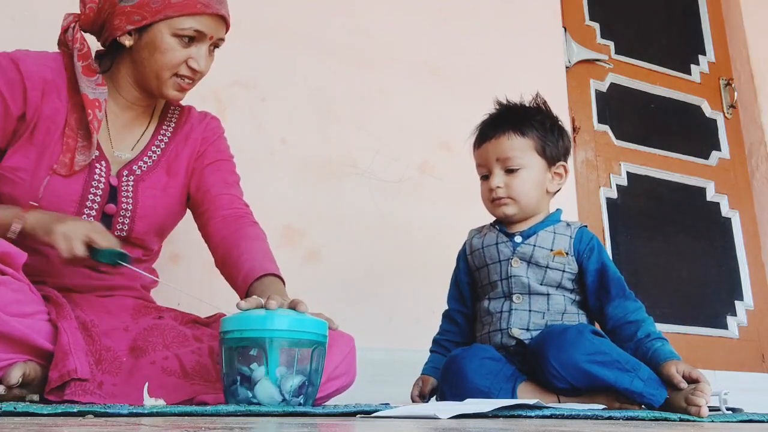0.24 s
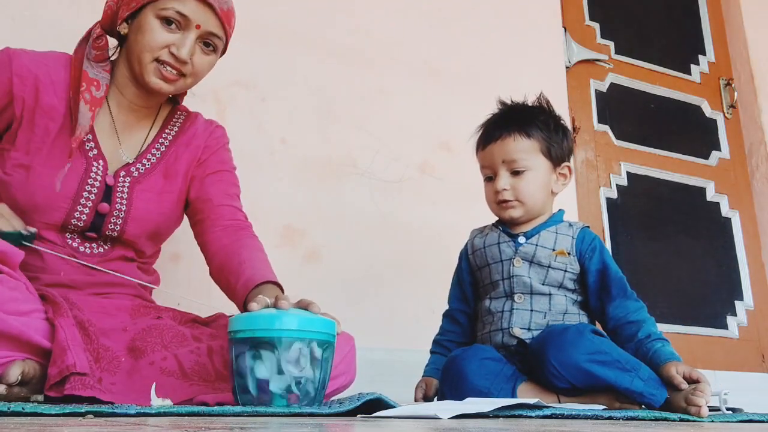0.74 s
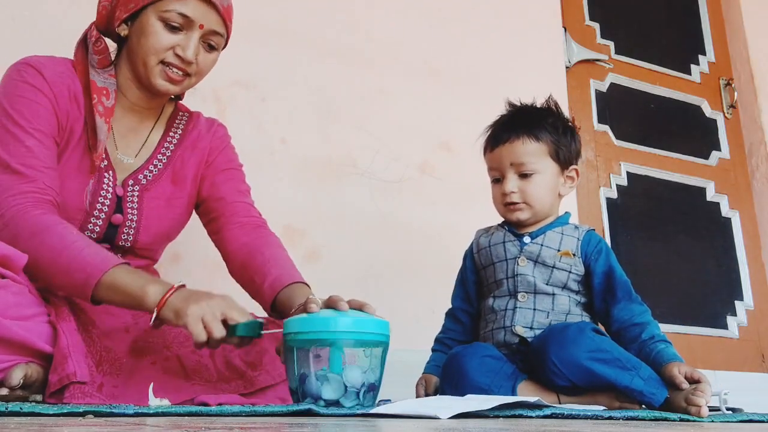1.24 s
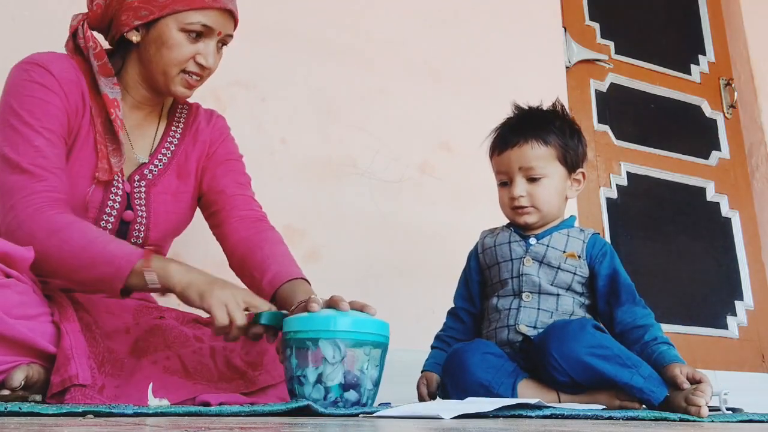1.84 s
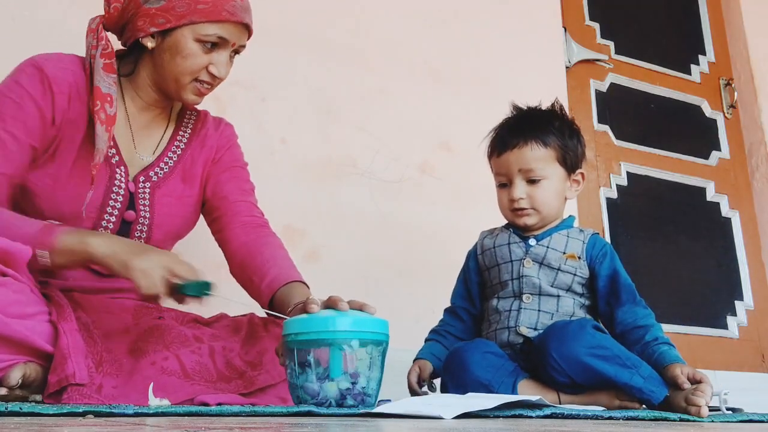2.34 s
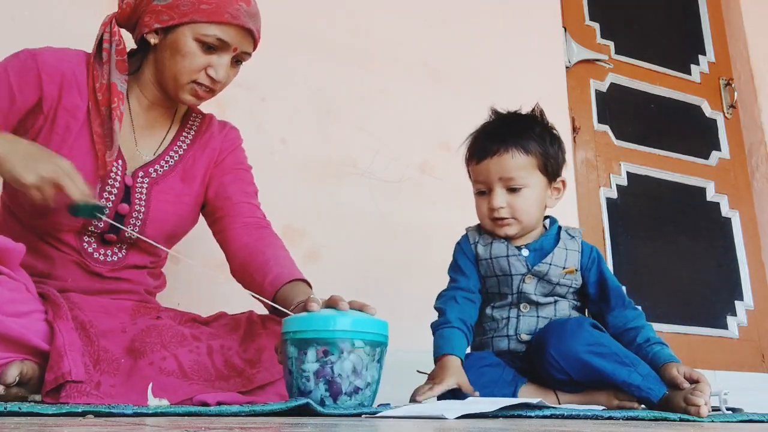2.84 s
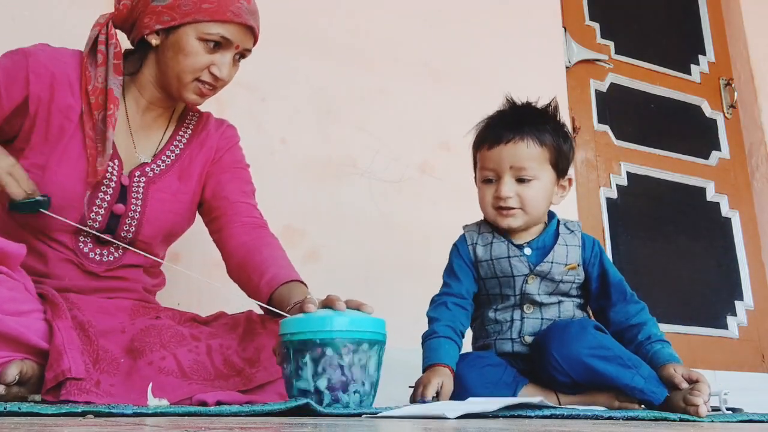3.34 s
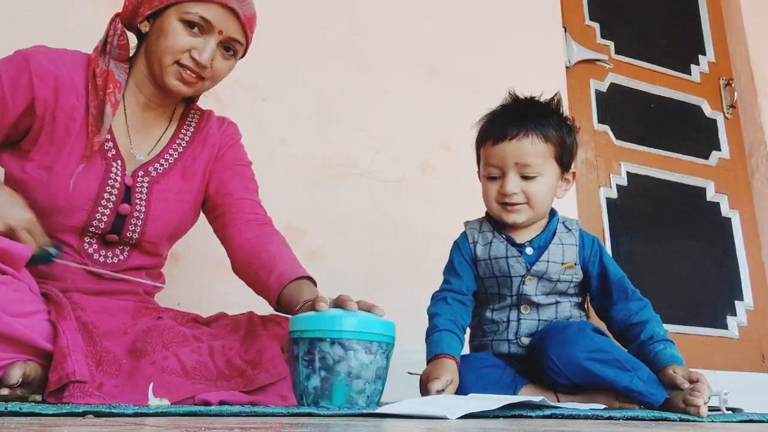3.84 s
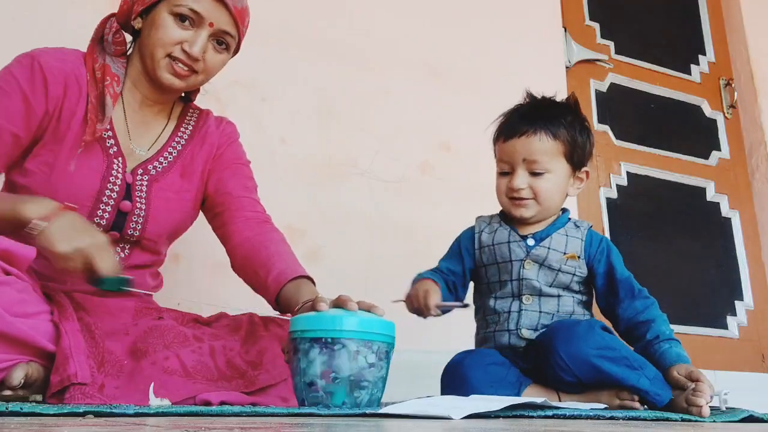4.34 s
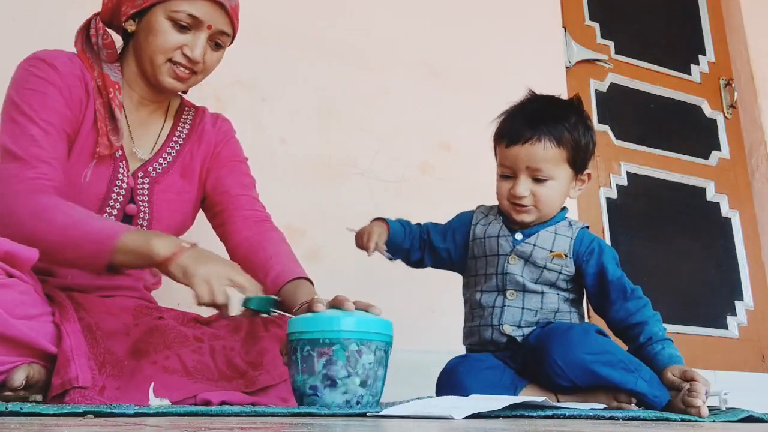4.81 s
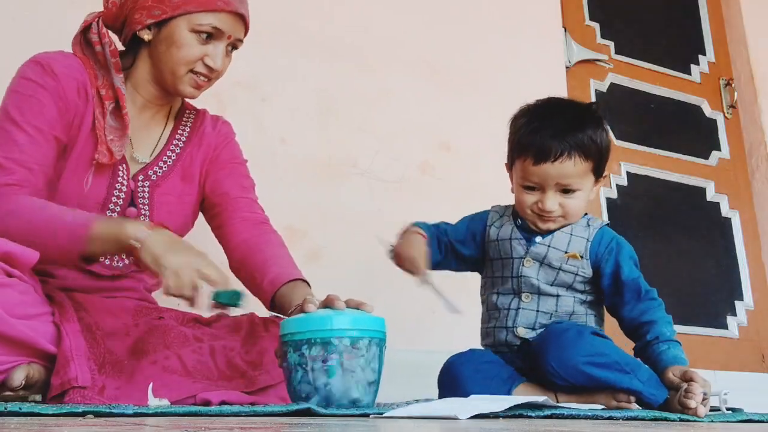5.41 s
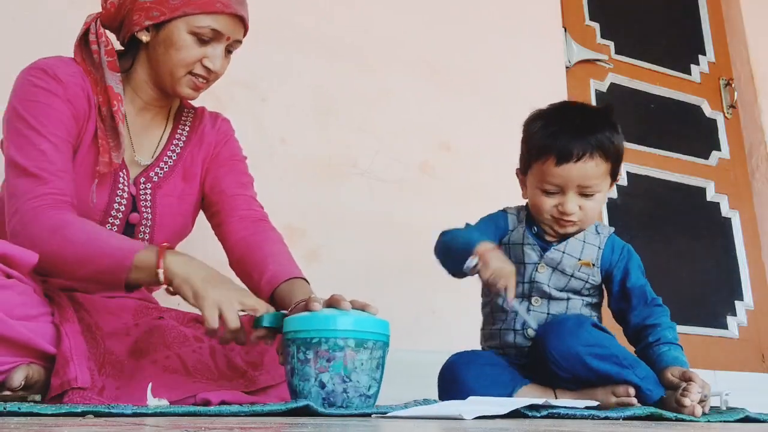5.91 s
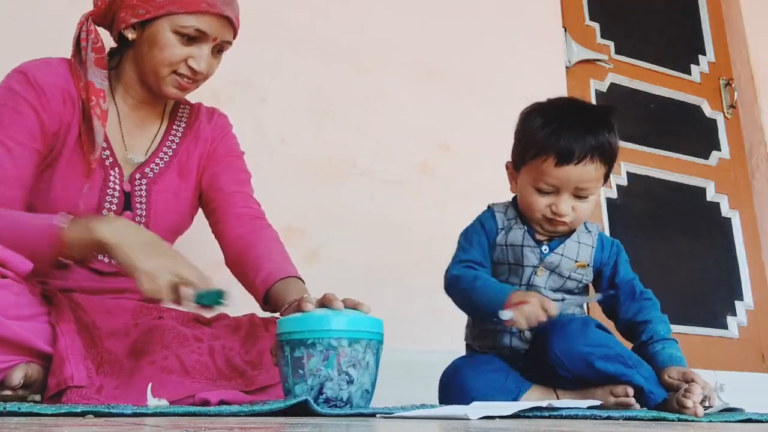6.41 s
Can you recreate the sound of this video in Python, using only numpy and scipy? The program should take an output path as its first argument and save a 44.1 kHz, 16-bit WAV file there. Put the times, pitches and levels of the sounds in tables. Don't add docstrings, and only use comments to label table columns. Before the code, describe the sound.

A pull-cord hand chopper is yanked eleven times, each whirring, clattering burst in a plastic bowl followed by a ratcheting cord rewind.

```python
import sys
import numpy as np
from scipy import signal
from scipy.fft import rfft, irfft
from scipy.io import wavfile
from scipy.ndimage import uniform_filter1d, map_coordinates

SR = 44100
rng = np.random.default_rng(int(sys.argv[2]) if len(sys.argv) > 2 else 0)


def store_wav(level_fs):
    pcm = np.round(np.clip(np.atleast_2d(level_fs), -1, 1) * 32767)
    wavfile.write(sys.argv[1], SR, pcm.T.astype(np.int16))


def voltage_ratio(level):
    return 10 ** (np.asarray(level, float) / 20)


N = 293706

# frequency in Hz, density in dB per Hz.
CHOP_SPECTRUM = [(76, -41), (130, -17), (260, -0.5), (460, -4.5), (950, -1.5), (1300, -10), (2400, -8),
                 (3500, -15.5), (4100, -19.5), (5300, -29.5), (6200, -22.5), (7400, -20.5), (8100, -30),
                 (16000, -50.5)]
# centre in Hz, width in Hz, lift in dB.
BOWL_MODES = [(394, 150, 5), (504, 120, 6.5), (828, 100, 1), (1370, 160, 6.5), (1484, 71, 6),
              (1557, 37, -10.5), (1858, 17, 3.5), (2400, 50, -7.5)]


def chopping():
    force = blows(rate=520, scatter_db=2.5, own_db=7, rub=0.59, lump_db=0.0)
    force = force * sweeps() * stroke_gains(pulls() + rattles(), rasp_db=-1.5) * voltage_ratio(-1.0)
    return body(force, CHOP_SPECTRUM, BOWL_MODES, patchy_db=1.5)


# blades start in seconds, speeding up in seconds, full speed in seconds,
# slowing in seconds, strength in dB.
PULLS = [(0.016, 0.16, 0.028, 0.16, -19), (0.672, 0.13, 0.043, 0.13, -11.5),
         (1.492, 0.044, 0.13, 0.11, -18.5), (2.083, 0.12, 0.051, 0.12, -13.5),
         (2.681, 0.095, 0.093, 0.075, -14.5), (3.291, 0.11, 0.014, 0.1, -9.5),
         (3.85, 0.078, 0.075, 0.086, -11.0), (4.393, 0.096, 0.082, 0.079, -13.5),
         (4.97, 0.094, 0.086, 0.065, -13), (5.562, 0.076, 0.097, 0.057, -14.8),
         (6.123, 0.11, 0.081, 0.049, -15.0)]
# boom in dB over strength, clatter in dB over boom, edge in dB over boom.
PULL_STAGES = [
    (-36.5, 2, -16.5),
    (-29.5, -2.5, -19.5),
    (-8.5, 2, -11.5),
    (-10.5, 4.5, -15),
    (-36.5, 1.5, -27),
    (-53.5, -3.5, -14),
    (-65, 2, -18),
]
# clatter in dB, edge in dB, shove on the mat in dB, all over the usual.
PULL_LOADS = [(1, 1, -8), (-0.5, -2.5, -0.5), (-2.5, 3.5, 1), (0.8, 1.2, 6), (-0.5, -0.3, -3), (2, 0.5, -9),
              (.1, 0.8, -5), (.1, 0.6, -3.5), (-1, -1, -0.8), (0.5, -0.3, 3), (0.9, 0.5, 3.5)]


def pulls():
    edges_s = (0.022, 0.012, 0.068)
    return stages(PULLS, PULL_STAGES, edges_s, bulge_db=(2.5, 4), loads=PULL_LOADS)


# time in
# seconds, peak in dB, edge in dB over the peak, loose rattle in dB.
CATCHES = [(0.004, -36, -2, -37), (0.157, -18, -11.5, -50), (0.649, -34.5, 5.5, -50.5),
           (0.635, -33, -1, -42.5), (1.428, -38, -9, -52), (1.441, -30, 3, -50), (2.067, -31, 10, -42),
           (2.653, -23, -18, -34.5), (3.237, -15, -35, -39), (3.813, -20, -12, -33.5),
           (4.375, -24, -32, -57), (4.392, -6, -41, -52), (4.944, -25, -24, -54), (4.956, -17, -3, -52),
           (5.004, -17, -18, -42), (5.519, -16, -44, -37.5), (6.092, -18, -31, -42.5),
           (6.118, -15.5, -49, -50), (6.14, -26, -25, -49), (6.165, -11, -25, -46)]
# time after the catch in seconds, boom in dB, clatter in dB over boom,
# edge in dB over boom.
RATTLE = [
    (-.004, -27.5, -2, 3),
    (0, -0.5, -4.5, -7.5),
    (.03, -8.5, 1, -25),
    (.09, -12, -4, -16),
    (.12, -30, -2, -16),
]


def rattles():
    return [np.add(RATTLE, [s, db, 0, 0]) for s, _, _, db in CATCHES]


# moment of a pass at top speed in seconds, passes per second there.
SWEEPS = [(0.2075, 60.0), (0.8266, 61.5), (1.5993, 64.5), (2.2386, 83.0), (2.8256, 69.5), (3.4194, 83.5),
          (3.9643, 85.0), (4.5388, 82.0), (5.1114, 84.5), (5.689, 81.5), (6.2677, 81.0)]


def sweeps():
    spin_s = 0.15
    lift_db, scatter = (0.6, 1.1, 2.5, 8.5), 0.45
    t = np.arange(N) / SR
    top_s, rate = np.transpose(SWEEPS)
    pull = np.abs(t - top_s[:, None]).argmin(axis=0)
    from_top = np.clip(t - top_s[pull], -spin_s, spin_s)
    passes = rate[pull] * (from_top - from_top ** 3 / (3 * spin_s ** 2))
    size = 1 + scatter * rng.standard_normal((len(rate), 41))[pull, np.round(passes).astype(int)]
    speed = np.sqrt(np.abs(1 - (from_top / spin_s) ** 2))
    lift = size * np.cos(np.pi * passes) ** 4 * speed
    gain = voltage_ratio(np.array(lift_db)[:, None] * lift)
    return gain / np.sqrt(uniform_filter1d(gain ** 2, size=1500, axis=1))


# frequency in Hz, density in dB per Hz.
CHATTER_SPECTRUM = [(76, -40), (130, -14), (270, -0.5), (500, -2.5), (930, 5), (1150, -4), (1800, -5.5),
                    (3000, -2.5), (4400, -11.5), (5600, -20.5), (6350, -9.5), (7500, -11), (8200, -22),
                    (16000, -39.5)]
# centre in Hz, width in Hz, lift in dB.
LID_MODES = [(393, 17, 3.5), (500, 100, 8.5), (990, 47, 0.5), (1808, 54, 10.5), (2720, 70, 1.5),
             (4310, 250, 4)]


def rewinding():
    force = blows(rate=650, scatter_db=2.0, own_db=3.5, rub=0.59, lump_db=0.38)
    force = force * stroke_gains(returns(), rasp_db=-3.5) * voltage_ratio(2.0)
    return body(force, CHATTER_SPECTRUM, LID_MODES, patchy_db=1.5)


# spring lets go in seconds, speeding up in seconds, running in seconds,
# slowing in seconds, strength in dB.
REWINDS = [(0.327, 0.12, 0.082, 0.036, -28), (1.02, 0.081, 0.076, 0.035, -24.5),
           (1.811, 0.096, 0.023, 0.055, -25), (2.396, 0.078, 0.08, 0.038, -24),
           (2.999, 0.093, 0.032, 0.046, -21.5), (3.574, 0.027, 0.099, 0.042, -20.5),
           (4.131, 0.085, 0.046, 0.034, -19.5), (4.704, 0.094, 0.04, 0.034, -21.5),
           (5.274, 0.08, 0.056, 0.025, -20.5), (5.854, 0.083, 0.052, 0.028, -21),
           (6.434, 0.1, 0.051, 0.02, -23)]
# boom in dB over strength, clatter in dB over boom, edge in dB over boom.
REWIND_STAGES = [
    (-42.5, 0.5, -2),
    (-16, -0.5, -3.5),
    (-11, 3, -2),
    (-15, 3, -0.5),
    (-24.5, 5.5, 4),
    (-47.5, -2.5, 4.5),
    (-62.5, 3.5, -8),
]
# clatter in dB, edge in dB, shove on the mat in dB, over the usual.
REWIND_LOADS = [(-0.79, -1.5, -4), (-2, -0.45, 7.5), (1, 1, .1), (1, -0.35, -4), (-0.067, -0.84, 2),
                (0.31, -1.9, -7), (1, -0.71, -2), (.1, -0.016, -24), (0.25, -0.28, -9), (0.22, -0.66, -10),
                (0.68, 0.32, 0)]


def returns():
    edges_s = (0.023, 0.048, 0.16)
    return stages(REWINDS, REWIND_STAGES, edges_s, bulge_db=(-0.26, -2.8), loads=REWIND_LOADS)


# time in seconds, peak in dB, edge in dB over the peak.
TICKS = [(0.335, -35.5, -5), (1.028, -32, -16), (1.055, -8.5, -14), (1.337, -49.5, 10), (1.808, -19.5, -20),
         (3.002, -9.5, -39), (3.567, -22, -24), (3.58, -28, -16), (3.636, -26, -15.5), (3.653, -16, -12),
         (4.134, -9, -26), (4.214, -17, -21), (4.702, -12, -23), (4.789, -28, -19), (5.273, -11, -26),
         (5.459, -22, -30), (5.849, -25, -18), (5.91, -24, -14), (6.435, -6.5, -29), (6.534, -9.5, -15)]
# time in seconds, peak in dB, edge in dB over the peak.
PIECES = [(0.111, -13, -1), (0.171, -5.5, -1), (0.716, -25, -19), (0.733, -7, -9), (0.755, -4, -18),
          (1.515, -19, -13), (1.53, -13, -6), (1.574, -13, -1), (2.109, -12, -20), (2.176, -15, -2),
          (2.715, -13.5, -15), (2.747, -8.5, -24), (2.766, -7, -18), (2.818, 5, -41), (3.326, -10.5, -13),
          (3.368, -4.5, -7), (3.38, 6.5, -34), (3.401, -19, -40), (3.416, -14, -28), (3.433, -7, -29),
          (3.886, -7, -35), (3.951, 5.5, -22), (4.474, -15, 2), (4.589, -16, -32), (5.024, -7, -24),
          (5.044, -4.5, -25), (5.627, -2, -33), (5.652, -19, -26.5), (6.203, -3.5, -24), (6.229, 1, -37)]
# frequency in Hz, density in dB per Hz.
KNOCK_SPECTRUM = [(100, -33), (350, 0), (700, -7), (950, 6.5), (1300, -10), (2400, -7.5), (3500, -13),
                  (5300, -25), (7000, -23), (8200, -33.5), (16000, -54.5)]


def knocks():
    force = np.zeros((4, N + SR))
    # events, boom in dB over the peak, hardness of the first contact
    kinds = [(CATCHES, -15, 3.4), (TICKS, -14, 3.7), (PIECES, -17, 8)]
    for events, boom_db, snap in kinds:
        for s, db, edge_db in [row[:3] for row in events]:
            blow = rng.choice([-1, 1]) * contact([0.013, 0.038, 0.031, 0.011], snap)
            strength = range_gains(db + boom_db + 10, db + 6.5, db + edge_db + 3.0, rasp_db=-0.5)
            force[:, round(s * SR):][:, :blow.shape[1]] += blow * strength[:, None]
    return body(force[:, :N], KNOCK_SPECTRUM, BOWL_MODES, patchy_db=-2.0)


def blows(rate, scatter_db, own_db, rub, lump_db):
    size = voltage_ratio(scatter_db * np.minimum(rng.exponential(size=N), 2))
    hit = (rng.random(N) < rate / SR) * size * rng.choice([-1, 1], N)
    train = hit * voltage_ratio(own_db * rng.uniform(-1, 1, (4, N)))
    one_contact = contact([0.0013, 0.0054, 0.0013, 0.0049], snap=6.4)
    train = signal.fftconvolve(train, one_contact, axes=1)[:, :N]
    train = train / np.std(train, axis=1, keepdims=True)
    step = np.arange(N) * 150 / SR
    depth_db = lump_db * np.array([[1], [1], [1.4], [1.8]])
    lumps = voltage_ratio(depth_db * map_coordinates(rng.standard_normal(int(step[-1]) + 4), [step]))
    rub = np.clip(rub, 0, 1)
    force = lumps * (np.sqrt(1 - rub) * train + np.sqrt(rub) * rng.standard_normal((4, N)))
    return force / np.sqrt(np.abs(uniform_filter1d(force ** 2, size=2600, axis=1)) + 1e-9)


def contact(t60, snap):
    t = np.arange(900) / SR
    force = rng.standard_normal(len(t)) * voltage_ratio(-60 * t / np.array(t60)[:, None])
    force[:, 0] = snap
    return force / np.linalg.norm(force, axis=1, keepdims=True)


def body(force, spectrum, modes, patchy_db):
    ring = signal.fftconvolve(force, answers(spectrum, modes), axes=1)[:, :N].sum(axis=0)
    z = signal.stft(ring, nperseg=256)[2]
    spots = uniform_filter1d(rng.standard_normal(z.shape), size=3, axis=0)
    spots = uniform_filter1d(spots, size=4, axis=1)
    return signal.istft(z * voltage_ratio(patchy_db * unit(spots)), nperseg=256)[1][:N]


SPLITS_HZ = [700, 2400, 5000]


def answers(spectrum, modes):
    hz = np.fft.rfftfreq(4096, 1 / SR)
    db = along(spectrum, hz)
    db = db + sum(lift / (1 + (2 * (hz - centre) / width) ** 2) for centre, width, lift in modes)
    below = [0 * hz] + [1 / (1 + (hz / edge) ** 10) for edge in SPLITS_HZ] + [hz ** 0]
    gain = voltage_ratio(db) * np.sqrt(np.abs(np.diff(below, axis=0)))
    cepstrum = irfft(np.log(gain + 1e-7))
    cepstrum[:, 1:2048] *= 2
    cepstrum[:, 2049:] = 0
    h = irfft(np.exp(rfft(cepstrum)))[:, :2048]
    return h / np.linalg.norm(h, axis=1, keepdims=True)


def stages(rows, shape, edges_s, bulge_db, loads):
    rest, go, top, slow, last, *after = np.array(shape)
    up = (go + top) / 2 + [bulge_db[0], 0, 0]
    down = (slow + last) / 2 + [bulge_db[1], 0, 0]
    lead, stop, settle = edges_s
    tables = []
    for (start, rise, hold, fall, db), (clatter_db, edge_db, _) in zip(rows, loads):
        spans = [0, lead, rise / 2, rise / 2, hold, fall / 2, fall / 2, stop, settle]
        s = start - lead + np.cumsum(np.abs(spans))
        levels = np.add([rest, go, up, top, slow, down, last, *after], [db, clatter_db, edge_db])
        tables.append(np.column_stack([s, levels]))
    return tables


def stage_db(tables):
    t = np.arange(N) / SR
    db = np.full((3, N), -140.)
    for rows in tables:
        s, boom, clatter, edge = np.transpose(rows)
        levels = (boom, boom + clatter, boom + edge)
        db = np.maximum(db, [np.interp(t, s, v, -140, -140) for v in levels])
    return db


def stroke_gains(tables, rasp_db):
    return uniform_filter1d(range_gains(*stage_db(tables), rasp_db), size=90, axis=1)


def range_gains(boom, clatter, edge, rasp_db):
    return voltage_ratio(np.array([boom, clatter, 0.62 * clatter + 0.37 * edge + rasp_db, edge]))


# frequency in Hz, density in dB per Hz.
MAT_SPECTRUM = [(25, -22), (45, -26), (75, -11), (110, -4.5), (170, 1), (260, 1), (400, -72.5)]


def rocking():
    shoves = [rows + [0, load[2] - 19.5, 0, 0] for rows, load in zip(pulls(), PULL_LOADS)]
    shoves += [rows + [0, load[2] - 18.5, 0, 0] for rows, load in zip(returns(), REWIND_LOADS)]
    lag_s, growth, sway_db, rest_db = 0.023, 0.86, 3.5, -79
    t = np.arange(N) / SR
    sway = map_coordinates(rng.standard_normal(int(t[-1] * 6) + 4), [t * 6])
    late_db = np.interp(t - lag_s, t, stage_db(shoves)[0])
    db = -40 + growth * (late_db + 41.5) + sway_db * sway
    level = uniform_filter1d(voltage_ratio(db), size=1300) + voltage_ratio(rest_db)
    return level * unit(coloured(rng.standard_normal(N), MAT_SPECTRUM))


# frequency in Hz, time to fall by 60 dB in seconds.
ROOM_DECAY = [(200, 0.085), (2000, 0.16), (10000, 0.12)]


def room(x):
    hz, t, z = signal.stft(rng.standard_normal(SR // 3), SR, nperseg=256)
    decay = voltage_ratio(-60 * t / along(ROOM_DECAY, hz)[:, None])
    tail = signal.istft(z * decay, SR, nperseg=256)[1]
    return signal.fftconvolve(np.pad(x, (200, 0)), tail / np.linalg.norm(tail))[:N]


# frequency in Hz, density in dB per Hz.
AIR_SPECTRUM = [(40, -16.5), (110, 8), (400, 20), (1000, -6.5), (7000, -1.5), (15000, -32)]


def hush(loud):
    closing = voltage_ratio(-60 * np.arange(SR // 2) / SR / 0.12)
    release = signal.fftconvolve(loud ** 2, closing / SR)[:N]
    level = voltage_ratio(-87) + voltage_ratio(-7.0) * np.sqrt(np.abs(release))
    return level * unit(coloured(rng.standard_normal(N), AIR_SPECTRUM))


def coloured(x, spectrum):
    return irfft(rfft(x) * voltage_ratio(along(spectrum, np.fft.rfftfreq(N, 1 / SR))), N)


def along(points, hz):
    f, v = np.transpose(points)
    return np.interp(np.log(hz + 1), np.log(f + 1), v)


def unit(x):
    return x / np.sqrt(np.mean(x ** 2) + 1e-20)


def scene():
    chopper = chopping() + rewinding() + knocks()
    return (chopper + voltage_ratio(-12.5) * room(chopper) + rocking() + hush(chopper))[None]


def band_limit(x):
    return signal.sosfilt(signal.butter(12, 16300, fs=SR, output="sos"), x)


# frequency in Hz, gain in dB.
MIC_RESPONSE = [(30, -14), (62, -10), (80, 0), (7600, 0), (7900, -8), (8300, 0), (15800, 0), (15900, -80)]


def record(dry):
    soft = dry / (1 + np.abs(dry / 0.93) ** 4) ** 0.25
    return band_limit(coloured(soft, MIC_RESPONSE))


dry = scene()
out = record(dry)
store_wav(out)
```